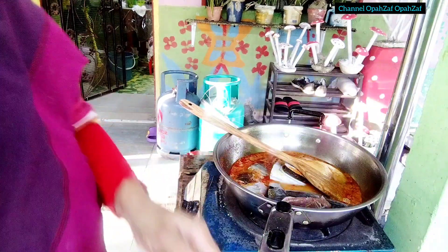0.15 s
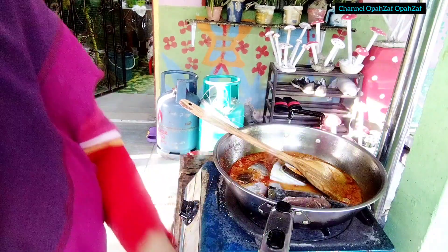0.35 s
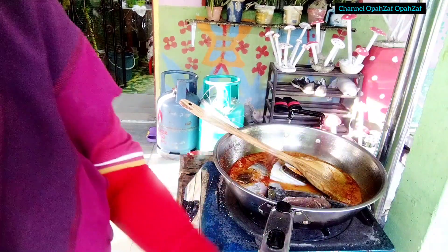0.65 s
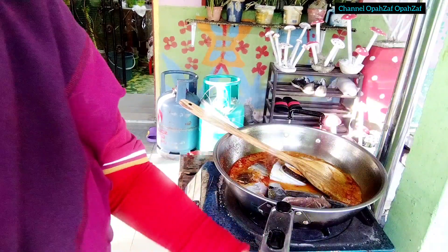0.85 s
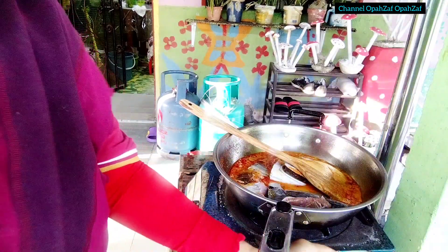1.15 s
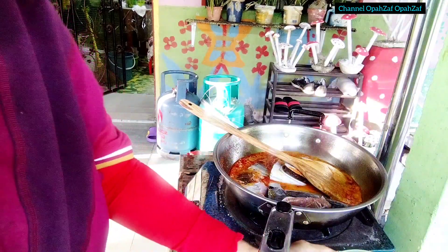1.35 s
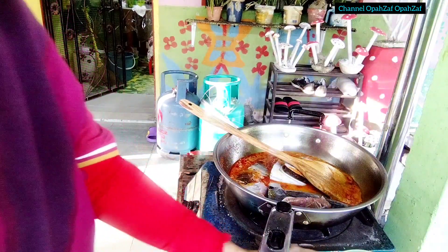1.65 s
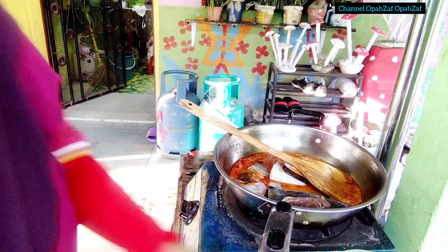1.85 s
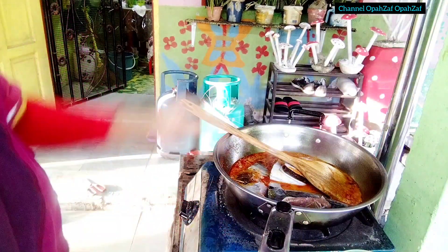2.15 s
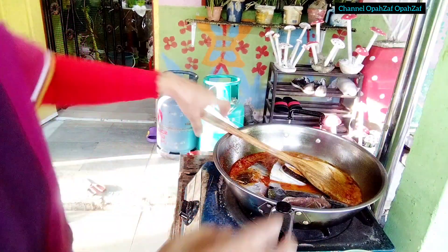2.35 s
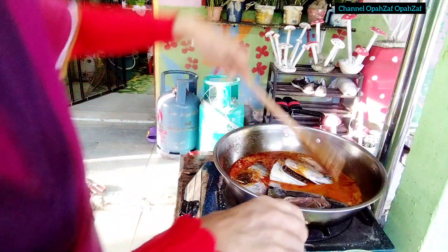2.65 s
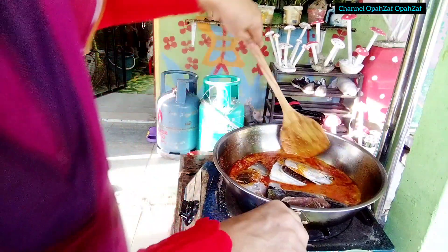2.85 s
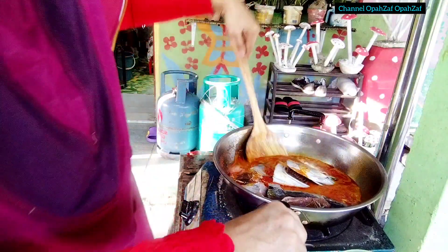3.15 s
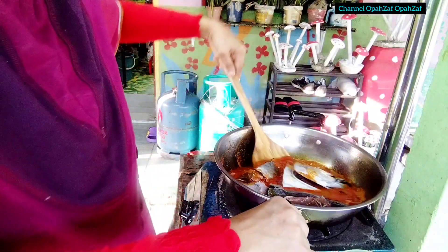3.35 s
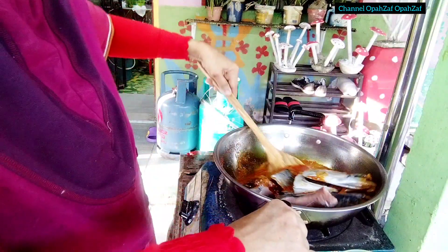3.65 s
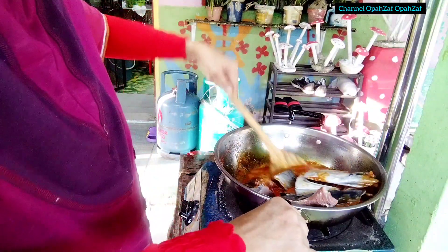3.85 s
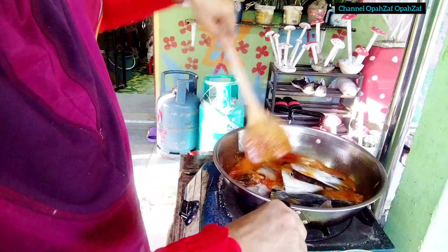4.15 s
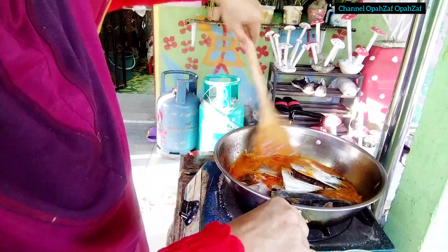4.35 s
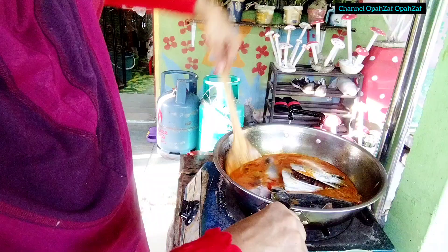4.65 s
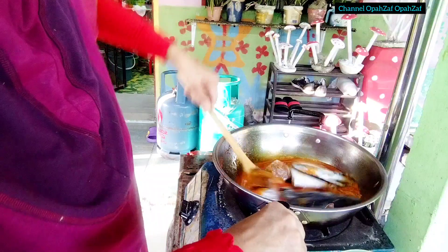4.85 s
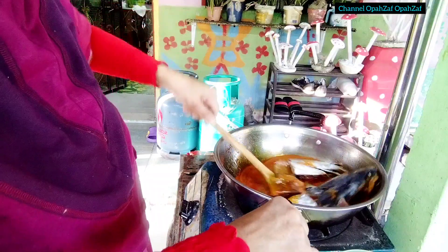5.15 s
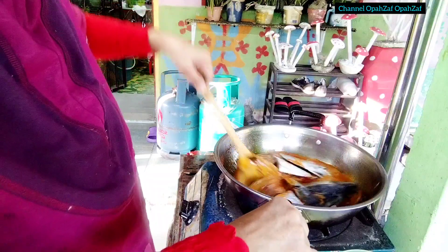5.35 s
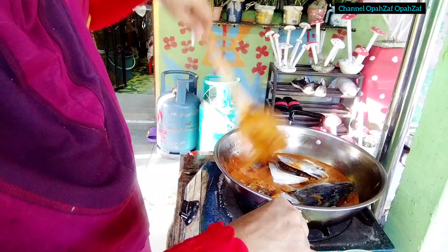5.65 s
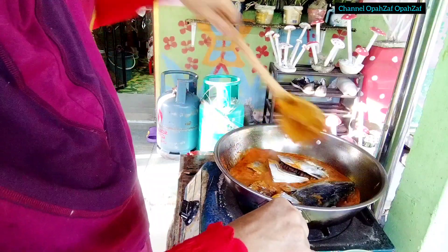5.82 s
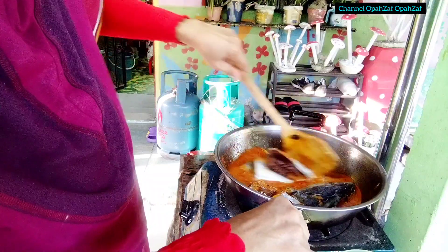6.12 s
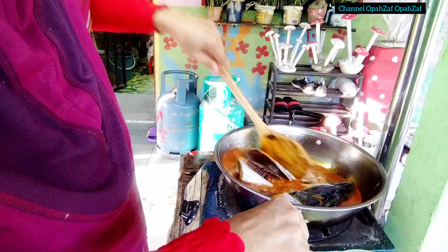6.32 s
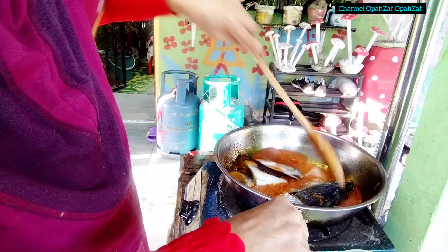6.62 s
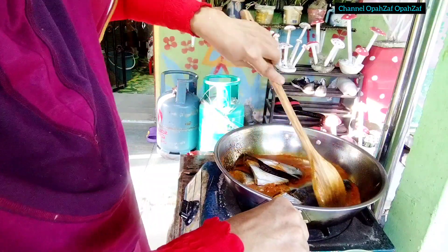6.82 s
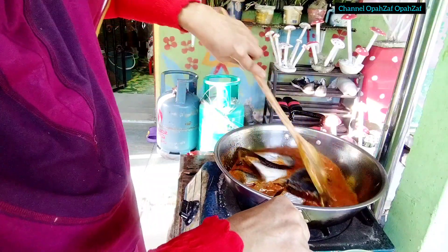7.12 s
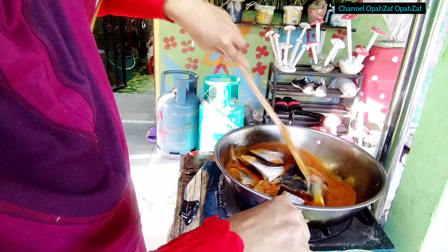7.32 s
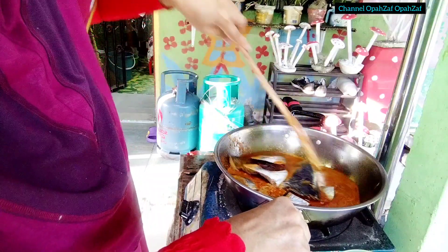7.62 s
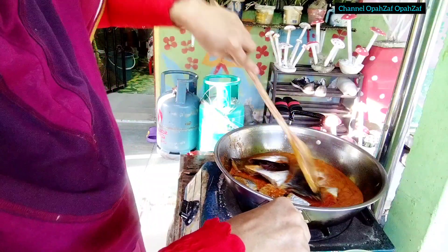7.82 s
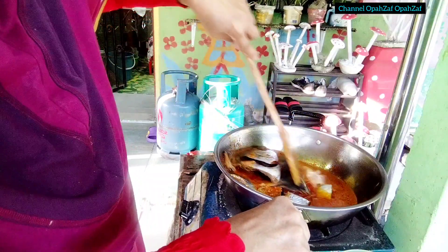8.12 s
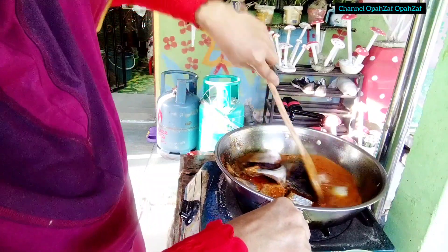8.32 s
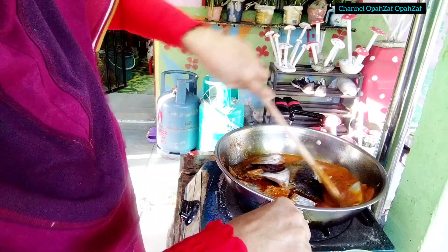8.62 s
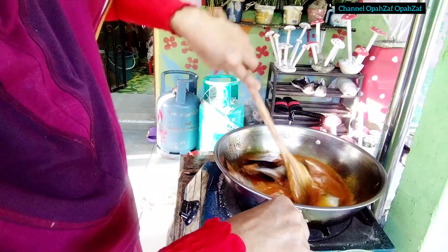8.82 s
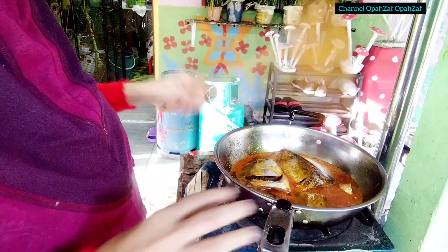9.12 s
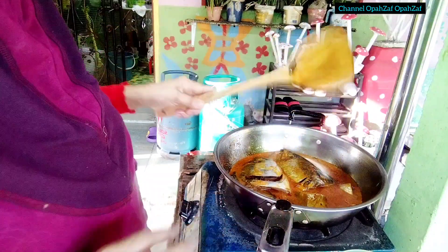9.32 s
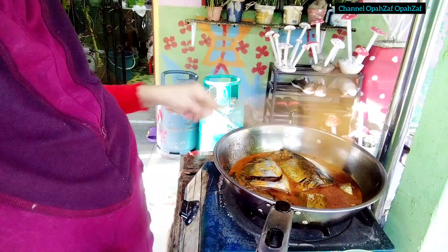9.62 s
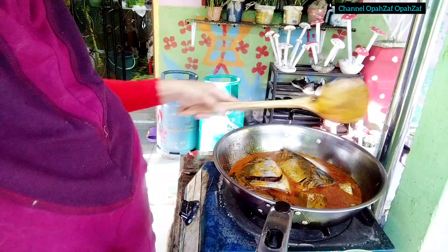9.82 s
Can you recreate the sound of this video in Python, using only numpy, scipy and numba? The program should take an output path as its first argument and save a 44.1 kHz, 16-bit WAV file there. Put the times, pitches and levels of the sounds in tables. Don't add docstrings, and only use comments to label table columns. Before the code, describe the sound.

Close to a pan of simmering curry outdoors: crisp spits and thick plops over a thin, patchy fizz, with a few early dull knocks. From about three seconds a wooden spatula stirs, scraping steel, tapping and knocking the pan, each push flaring into bright sizzle. Just before nine seconds the sound cuts abruptly to a quieter simmer with tiny ticks, small drops and soft knocks. Phone microphone, dry, with watery noise reduction.

```python
import sys
import numpy as np
from scipy import signal
from scipy.fft import rfft, irfft, next_fast_len
from scipy.io import wavfile
from scipy.ndimage import uniform_filter1d
from numba import njit

SR = 44100
rng = np.random.default_rng(int(sys.argv[2]) if len(sys.argv) > 2 else 0)


def unload_audio(sound):
    columns = np.transpose(np.atleast_2d(sound))
    steps = np.round(np.clip(columns, -1, 1) * 32767)
    wavfile.write(sys.argv[1], SR, steps.astype(np.int16))


def undo_db(level):
    steps = np.asarray(level, float) / 20
    return 10 ** steps


N = 440118
TIME = np.arange(N) / SR
CUT_S = 8.869

# frequency in Hz, density in dB per Hz.
SIMMER_SPECTRUM = [(88, -23), (150, 3.5), (405, -6), (1050, -9), (1490, -2.5), (2030, -6), (2240, -15.5),
                   (2470, -13.5), (3180, -3.5), (4980, -14.5), (7950, 1.5), (12400, -10), (15700, 2.5)]
# frequency in Hz, density in dB per Hz.
SIZZLE_SPECTRUM = [(530, -47.5), (900, -25.5), (1120, -6.5), (1320, -7), (1780, -4), (2010, -5.5),
                   (2210, -4.5), (2370, -5), (3360, -1), (4010, -1), (5890, -15.5), (8130, -4.5),
                   (12200, -21.5), (15000, -17), (15700, -16)]
# frequency in Hz, density in dB per Hz.
BUBBLE_SPECTRUM = [(59, -58), (100, -32.5), (174, -19.5), (228, -4.5), (323, -10.5), (412, -1.5),
                   (609, -16.5), (693, -7), (1100, -7.5), (1430, -30.5), (2420, -120)]
# frequency in Hz, density in dB per Hz.
HISS_SPECTRUM = [(12, -37), (30, -9), (90, -1), (200, -9), (1500, -11.5), (3000, -11), (4700, -16),
                 (5600, -11.5), (10000, -15.5), (12500, -21), (15700, -13.5)]
# frequency in Hz, level in dB.
LEARNT_NOISE = [(150, 1.5), (400, -1.5), (700, 3.5), (850, 1), (1000, 11), (1280, 12.5), (1420, 5.5),
                (1520, 2), (1750, 7), (2030, -0.5), (2280, 10.5), (2700, 6.5), (3100, -0.5), (4100, 3),
                (4600, 10.5), (6300, 4.5), (8000, -4), (10300, -1), (15700, -10.5)]
# frequency in Hz, level in dB.
PAN_MODES = [(140, -14), (195, -17), (240, -11), (295, -8), (390, -3.5), (425, -5), (555, -8.5), (630, -10),
             (750, -5), (970, -15.5), (1140, -0.5), (1400, -0.5), (1640, -19), (2040, -3.5)]
# frequency in Hz, width in Hz, level in dB.
RIM_MODES = [(1500, 35, -1), (2050, 150, 2), (2430, 44, 8), (2950, 290, -3), (3500, 940, 1.5),
             (4080, 390, -3), (5780, 540, 3.5), (6210, 170, -9)]
# time in seconds, calm sizzle level in dB.
EDGE_HEAT = [(0.0, -30.5), (0.7, -33), (1.5, -33.5), (2.2, -36), (2.64, -35), (2.82, -37), (3.5, -50.5),
             (3.62, -33.5), (4.1, -36.5), (4.27, -38.5), (5.0, -43), (5.75, -38.5), (6.15, -34.5),
             (6.45, -44.5), (6.7, -39), (8.0, -43), (8.87, -49)]
# start in seconds, peak in dB, hold in seconds, fade in dB per second, depth in dB.
SAUCE_FLARES = [(1.985, -41, 0.12, 26, 2), (2.841, -29.5, .02, 27, -3), (2.961, -30, 0.041, 24.5, 1),
                (3.043, -29, 0.03, 32, -1.5), (3.267, -39.5, 0.098, 91, 12), (3.446, -41, 0.27, 11.5, 8.5),
                (4.256, -27.5, 0.13, 26, 1.5), (4.713, -42, 0.025, 60, -11), (5.036, -30, 0.22, 45, -1),
                (5.58, -39, 0.024, 84, 3), (6.48, -37.5, 0.019, 93, -4.5), (6.76, -26, 0.042, 62, -1),
                (6.9, -35.5, 0.18, 21, 1.5), (7.086, -29, 0.073, 23, -3), (7.156, -24, 0.17, 39, 1),
                (7.724, -36.5, 0.021, 54.5, 1.5), (8.019, -39.5, 0.2, 30, -4), (8.361, -28, 0.017, 30.5, 3),
                (8.672, -32, 0.059, 20.5, 1)]
# start in seconds, fine fizz in dB, coarse spit in dB, mid fizz in dB.
LATE_SPATTER = [
    (8.872, -85, -46.5, -80.5),
    (8.948, -49, -50.5, -46),
    (9.052, -54, -70, -52),
    (9.19, -71, -49, -80),
    (9.365, -50, -42.5, -43.5),
    (9.479, -56.5, -50.5, -44.5),
    (9.62, -62, -51.5, -80),
    (9.81, -69, -66, -64),
    (9.9, -73, -52, -80),
    (9.955, -62, -61, -81),
]
# time in seconds, deep plops in dB, share of small light bubbles in dB.
BOIL_STRENGTH = [(0.0, -56, -2), (1.1, -59, -6), (1.6, -60.5, -9), (2.05, -67.5, 4), (2.25, -59.5, -6.5),
                 (2.6, -64.5, -2), (2.83, -54, -9), (3.5, -58, 2), (4.08, -53.5, -5), (4.75, -64, -0.5),
                 (5.0, -54, -5), (5.3, -58.5, 4), (5.6, -62.5, 4.5), (5.9, -68.5, -2), (6.6, -73, -0.5),
                 (7.22, -77, 8), (7.5, -65, 11.5), (7.95, -74, -23.5)]
# start in seconds, peak in dB,
# frequency in Hz.
LOUD_SPITS = [(0.0328, -22.5, 7340), (0.0857, -11, 14700), (0.194, -20, 7980), (0.312, -17, 7950),
              (0.3471, -21, 8800), (0.3998, -11, 9900), (0.4189, -19, 9860), (0.432, -12.5, 7650),
              (0.4509, -19, 8230), (0.4744, -12, 8130), (0.59, -18, 7400), (0.6464, -10, 7300),
              (0.6634, -12, 7900), (0.716, -17, 8500), (0.7507, -22, 8430), (0.841, -13, 8600),
              (0.8959, -15, 7860), (0.9228, -14, 8600), (0.9552, -13, 7560), (1.0006, -29, 7800),
              (1.055, -11, 10000), (1.0745, -11, 7870), (1.2361, -20, 7440), (1.3154, -12.5, 7900),
              (1.4416, -27, 8200), (1.4962, -16, 7900), (1.5793, -20, 8130), (1.6818, -25, 8430),
              (1.727, -15, 8000), (1.8116, -11.5, 7700), (1.8787, -13, 7810), (1.8992, -13, 8480),
              (1.9964, -6, 7640), (2.0428, -12, 7830), (2.0645, -14, 10200), (2.1056, -7.5, 8200),
              (2.14, -22, 8000), (2.171, -14.5, 7900), (2.2266, -13.5, 8090), (2.2473, -8, 8060),
              (2.2738, -10, 7040), (2.2927, -23, 8200), (2.3416, -16, 7700), (2.379, -14, 7700),
              (2.4239, -13, 7930), (2.441, -23, 7900), (2.4557, -13, 8250), (2.486, -24, 8840),
              (2.575, -26, 8150), (2.598, -15, 7970), (2.7462, -17, 8500), (2.798, -19, 8280),
              (2.818, -14, 8450), (2.869, -10, 8450), (2.8833, -25, 8070), (2.9018, -16, 8070),
              (2.9272, -21, 8070),
              (3.0895, -17, 14600), (3.1818, -14.5, 8000), (3.7939, -12, 14900), (3.8338, -21, 14900),
                 (4.3332, -29, 8400), (4.4075, -20, 7650), (4.5687, -16, 8400), (4.5976, -9, 14900),
                 (4.624, -3, 14700), (4.6789, -4, 14600), (4.7562, -8, 7200), (4.8096, -7, 14300),
                 (4.8695, -41, 7640), (4.8695, -13, 8030), (4.9812, -9, 14900), (5.1209, -18, 7700),
                 (5.3823, -19, 8010), (5.4247, -25, 8210), (5.51, -15, 8660), (5.5888, -17, 7870),
                 (5.6048, -9.5, 7800), (5.9106, -19, 8800), (6.166, -16, 8630), (6.2488, -13.5, 8650),
                 (6.7876, -21, 7800), (6.8131, -16, 7830), (6.9208, -16, 8060), (7.059, -8.5, 7900),
                 (7.0929, -16, 8300), (7.1074, -14, 8340), (7.1398, -19, 8420), (7.1702, -6.5, 7620),
                 (7.2291, -15, 7630), (7.2555, -2.5, 7700), (7.3239, -6.5, 8200), (7.3658, -4, 8400),
                 (7.5489, -33, 7800), (7.5873, -7.5, 8300), (7.7649, -27, 15200), (7.7649, -18, 8300),
                 (7.8038, -22, 8400), (7.8337, -10.5, 7760), (7.8836, -4, 14800), (7.916, -8, 14500),
                 (8.2608, -16.5, 14900), (8.3506, -6, 14900), (8.392, -13, 14900), (8.4872, -11, 8200),
                 (8.5391, -13, 8100), (8.5656, -15, 8300), (8.5855, -15, 7800), (8.6409, -11, 8200),
                 (8.7028, -14.5, 8300), (8.7152, -9, 8300), (8.7871, -19, 14900)]
# start in seconds, peak in dB, frequency in Hz.
LATE_TICKS = [(8.922, -31.5, 14300), (8.9471, -16, 8000), (8.9738, -30, 14250), (8.9795, -30.5, 8030),
              (9.0021, -32, 8170), (9.04, -29, 14100), (9.054, -21.5, 9100), (9.0897, -18.5, 14500),
              (9.1313, -24.5, 14140), (9.176, -30.5, 13200), (9.196, -31, 13960), (9.2161, -25.5, 14900),
              (9.369, -18, 14900), (9.415, -31, 14800), (9.4361, -42, 14900), (9.458, -27.5, 14300),
              (9.48, -21.5, 8140), (9.496, -25, 13100), (9.5438, -42, 14700), (9.557, -23.5, 14300),
              (9.613, -29, 13000), (9.673, -28, 14600), (9.7165, -32, 7700), (9.8142, -22, 8360),
              (9.9677, -26, 14900)]
# start in seconds, peak in dB, main ring in Hz, contact in milliseconds, ring t60 in seconds.
SPATULA_KNOCKS = [(0.825, -34, 385, 0.73, 0.087), (1.13, -24, 337, 0.81, 0.12),
                  (1.281, -16.5, 620, 0.56, 0.095), (2.645, -35, 405, 0.87, 0.096),
                  (2.852, -35.5, 277, 0.73, 0.21), (2.98, -21.5, 1220, 0.19, 0.095),
                  (4.41, -27.5, 421, 0.46, 0.29), (4.42, -21.5, 1208, 0.24, 0.13),
                  (4.659, -33.5, 315, 0.75, 0.35), (4.91, -32, 528, 0.8, 0.27),
                  (6.076, -25.5, 251, 1.1, 0.28), (6.845, -38, 420, 1.1, 0.5),
                  (7.302, -64, 1200, 0.38, 0.08), (7.674, -37.5, 389, 1.9, 0.13),
                  (8.376, -23, 696, 0.34, 0.13), (8.396, -16.5, 771, 0.3, 0.14),
                  (9.625, -33, 387, 0.58, 0.074), (9.857, -36.5, 380, 0.47, 0.17),
                  (9.641, -37.5, 678, 0.39, 0.16), (9.651, -37.5, 300, 1.3, 0.5),
                  (9.885, -40, 476, 1.1, 0.28), (9.895, -41.5, 298, 0.99, 0.2),
                  (8.398, -22, 1250, 0.4, 0.12), (1.286, -32, 331, 0.51, 0.74),
                  (1.133, -26, 655, 0.77, 0.16), (8.385, -23, 128, 1.5, 0.15), (4.051, -42, 297, 0.9, 0.31)]
# start in seconds, peak in dB, frequency in Hz, length in seconds.
BLADE_RASPS = [
    (2.003, -21, 2690, 0.0027),
    (2.874, -41, 3770, 0.014),
    (3.353, -19, 3600, 0.011),
    (3.417, -17, 3040, 0.0023),
    (5.731, -24.5, 1900, 0.0038),
    (8.339, -38, 1970, 0.021),
    (8.344, -28, 1580, 0.0051),
]
# start in seconds, peak in dB.
BLADE_TAPS = [(2.98, -18), (4.419, -13), (5.52, -27), (5.529, -31), (5.6108, -16.5), (5.621, -26),
              (5.6312, -25), (5.647, -27), (5.6566, -29), (5.7344, -32), (7.531, -17), (7.786, -22),
              (7.805, -23), (7.835, -20.5), (8.069, -37), (8.18, -25)]
# time in seconds, ring in Hz, level in dB.
SCRAPE_STROKES = [
    [(3.06, 1540, -25), (3.12, 1560, -23.5), (3.2, 1630, -23), (3.3, 1380, -24.5), (3.42, 1330, -37)],
    [(4.3, 1500, -23), (4.45, 1500, -35), (4.7, 1490, -35)],
    [(5.1, 1930, -31), (5.2, 2560, -27.5), (5.3, 2390, -28), (5.42, 2150, -32)],
    [(7.2, 1260, -50), (7.3, 1190, -28.5), (7.45, 1280, -38), (7.6, 1230, -30.5)],
    [(5.1, 1500, -32), (5.2, 1620, -31), (5.3, 1600, -36), (5.48, 1500, -37)],
    [(5.2, 4240, -34), (5.27, 4100, -32), (5.36, 3900, -40)],
    [(6.78, 2330, -26), (6.84, 2640, -24), (6.95, 2280, -29)],
]
# start in seconds, peak in dB, frequency in Hz.
LATE_DROPS = [(8.892, -37, 2420), (8.8992, -42.5, 2650), (9.053, -56.5, 3000), (9.1166, -42, 4290),
              (9.15, -42.5, 5680), (9.194, -40.5, 3100), (9.269, -43, 5750), (9.3788, -43, 3500),
              (9.406, -56, 3340), (9.491, -45, 3400), (9.5574, -38.5, 3250), (9.6357, -41, 4100),
              (9.69, -41.5, 5570), (9.695, -39.5, 4800), (9.7285, -44, 4550), (9.7594, -45, 2180),
              (9.843, -39.5, 3340), (9.8979, -39.5, 3500), (9.18, -54, 5570), (9.272, -47.5, 7570),
              (9.31, -56, 5730), (9.37, -46, 5700), (9.553, -41.5, 6070), (9.642, -41.5, 2250),
              (9.71, -42, 4300), (9.732, -42, 1210), (9.76, -49, 4740), (9.784, -59, 6800),
              (9.872, -42.5, 5670), (9.95, -52, 5650), (9.319, -56, 422), (9.43, -58.5, 461),
              (9.365, -42.5, 2030), (9.39, -47.5, 2235), (9.43, -52, 2030), (9.48, -45, 1970),
              (9.15, -45, 2150), (9.529, -51, 2450), (9.8, -52, 826), (8.93, -44, 2050)]

SIMMER_DB, LATE_SIMMER_DB, HISS_DB = -40, -6, -73.5
FLARE_RISE_S, RISE_PER_HOLD = 0.021, 0.41
SPLASH_S, SPLASH_DB = 0.013, 3
TOP_DB, TOP_SLOPE = -4, 0.96
SPIT_DB, SPIT_SLOPE, SLOSH_DB, SLOSH_SLOPE = -6, 0.96, -6, 0.9
LATE_FIZZ_FADE_DB_S, LATE_SPIT_FADE_DB_S, LATE_MID_FADE_DB_S = 102, 44.5, 170
STIRRED_DB = -29.5
JOLT_DB, JOLT_FADE_DB_S, JOLT_PER_BOIL = -30, 63, 0.24
SPIT_GAIN_DB, LATE_TICK_GAIN_DB = -1, 4.5
STRIP, LATE_STRIP, STRIP_FLOOR_DB = 1.396, 1.7, -28
RELEASE_S, RIPPLE_DB, LATE_RIPPLE_DB = .045, 3.8, 3.5
LEARN_DB, LEARN_S = -3.5, 3.2


def level(x, db):
    return x * undo_db(db) / np.sqrt(np.mean(x ** 2))


def shape_db(points, hz):
    p = np.array(points, float)
    return np.interp(np.log(hz + 1), np.log(p[:, 0]), p[:, 1], left=-90, right=-90)


def colour(x, points):
    size = next_fast_len(N)
    spec = rfft(x, size)
    even = spec / np.sqrt(uniform_filter1d(np.abs(spec) ** 2, size=4000) + 1e-18)
    hz = np.arange(len(spec)) * SR / size
    return irfft(even * undo_db(shape_db(points, hz)), size)[:N]


def highpass(x, order, hz):
    return signal.sosfilt(signal.butter(order, hz, "high", fs=SR, output="sos"), x)


def band(x, lo_hz, hi_hz):
    return level(signal.sosfilt(signal.butter(3, [lo_hz, hi_hz], "band", fs=SR, output="sos"), x), 0)


def curve(rows, column):
    rows = np.array(rows, float)
    return np.interp(TIME, rows[:, 0], rows[:, column])


def burst_db(start, peak_db, rise_s, hold_s, fade_db_s):
    x = TIME - start
    rise = np.clip(x / rise_s, 1e-5, 1)
    return peak_db + 20 * np.log10(rise) - fade_db_s * np.maximum(x - rise_s - hold_s, 0)


def total_db(levels):
    return 10 * np.log10(sum(undo_db(2 * db) for db in levels) + 1e-30)


def walk(rate):
    k = int(SR / rate)
    held = np.repeat(rng.standard_normal(N // k + 1), k)
    return 0.81 * uniform_filter1d(held, k)[:N]


def blows(s, db):
    out = np.zeros(N)
    out[(s * SR).astype(int)] = undo_db(db)
    return out


@njit
def rings(out_len, start, hz, decay_s, glide, size):
    out = np.zeros(out_len)
    for k in range(len(start)):
        w, d = 2 * np.pi * hz[k] / SR, np.exp(-1 / (decay_s[k] * SR))
        a, ph, i = size[k], 0., int(start[k] * SR)
        while abs(a) > abs(size[k]) * .003 and i < out_len and w < 2.8:
            ph += w
            out[i] += a * np.sin(ph)
            a, w, i = a * d, w * glide, i + 1
    return out


def grains(count, lo_hz, hi_hz, cycles, spread_db, glide):
    when, pitch, strength, damping = rng.random((count, 4)).T
    hz = lo_hz * (hi_hz / lo_hz) ** pitch
    size = undo_db(spread_db * np.minimum(-np.log(1 - strength), 4.6))
    return rings(N, when * N / SR, hz, cycles * (0.2 + damping) / hz, glide, size * np.sqrt(hz / lo_hz))


def pan_rim(x, share):
    out = x.copy()
    for hz, width, db in RIM_MODES:
        out += share * undo_db(0.63 * db) * signal.lfilter(*signal.iirpeak(hz, hz / max(width, 30), fs=SR), x)
    return out


def simmer():
    fizz = grains(count=60000, lo_hz=195.5, hi_hz=14900.0, cycles=3.5, spread_db=2.5, glide=0.98)
    fizz = pan_rim(level(colour(fizz, SIMMER_SPECTRUM), SIMMER_DB - 3.0), share=1.0)
    fizz = highpass(fizz, 2, 380)
    return fizz * undo_db(2.36 * walk(6.3) + LATE_SIMMER_DB * (TIME > CUT_S))


def stirring():
    flares = [burst_db(s, db, FLARE_RISE_S + RISE_PER_HOLD * hold, hold, fade)
              for s, db, hold, fade, _ in SAUCE_FLARES]
    calm = curve(EDGE_HEAT, 1)
    main = total_db([calm] + flares)
    depth = total_db([calm] + [f + row[4] for f, row in zip(flares, SAUCE_FLARES)]) - main
    splash = np.zeros(N)
    for f, row in zip(flares, SAUCE_FLARES):
        since = np.maximum(TIME - row[0] - FLARE_RISE_S, 0)
        splash += SPLASH_DB * undo_db(f - main) ** 2 * np.exp(-since / SPLASH_S)
    swing = main + 30
    top = -30.0 + TOP_DB + TOP_SLOPE * swing - splash
    spit = -30.5 + SPIT_DB + SPIT_SLOPE * swing + 0.75 * depth
    slosh = -29.0 + SLOSH_DB + SLOSH_SLOPE * swing + depth + splash
    late_top = total_db([burst_db(s, db, 0.0026, 0, LATE_FIZZ_FADE_DB_S) for s, db, _, _ in LATE_SPATTER])
    late_main = total_db([burst_db(s, db, 0.0025, 0.015, LATE_MID_FADE_DB_S) for s, _, _, db in LATE_SPATTER])
    late_spit = total_db([burst_db(s, db, 0.01, 0, LATE_SPIT_FADE_DB_S) for s, _, db, _ in LATE_SPATTER])
    late_spit = late_spit + 0.5 + 2.9 * walk(30)
    late = [late_main, late_top, late_spit, late_spit - 18]
    return np.where(TIME < CUT_S, [main, top, spit, slosh], late)


def sizzle(main_db, top_db, spit_db, slosh_db):
    roar = level(grains(count=50000, lo_hz=1020.0, hi_hz=15900.0, cycles=1.2, spread_db=0.0, glide=0.96), 0)
    roar = level(colour(roar + .5 * rng.standard_normal(N), SIZZLE_SPECTRUM), 0)
    snaps = grains(count=9000, lo_hz=2500., hi_hz=16000., cycles=1.6, spread_db=2.3, glide=1.)
    snaps = level(colour(snaps, SIZZLE_SPECTRUM), 0)
    calm = np.clip((-26.0 - main_db) / 9, .15, .6)
    pops = np.sqrt(1 - calm) * roar + np.sqrt(calm) * snaps
    pops = pan_rim(pops * undo_db(0.89 * walk(110) + 0.28 * walk(40)), share=0.38)
    out = band(pops, 5505, 11220) * undo_db(main_db)
    out += band(pops, 10690, 17000) * undo_db(top_db)
    out += band(pops, 2244, 6500) * undo_db(spit_db)
    out += band(pops, 1343, 2740) * undo_db(slosh_db - 2.5)
    deep_db = slosh_db - 7 + 0.65 * np.minimum(slosh_db + 32, 0)
    return out + band(pops, 942, 1346) * undo_db(deep_db)


def bubbling(slosh_db):
    plops = grains(count=6000, lo_hz=199.8, hi_hz=1085.0, cycles=14.0, spread_db=2.5, glide=1.00003)
    plops = colour(plops, BUBBLE_SPECTRUM)
    boil = curve(BOIL_STRENGTH, 1)
    jolts = total_db([burst_db(k[0], k[1] + JOLT_DB, 0.013, 0.025, JOLT_FADE_DB_S) for k in SPATULA_KNOCKS])
    jolts = jolts + JOLT_PER_BOIL * (boil + 60)
    stirred = STIRRED_DB + slosh_db + 0.75 * (slosh_db + 26)
    light = total_db([boil + curve(BOIL_STRENGTH, 2), jolts - 4, stirred])
    deep = total_db([boil, jolts])
    return band(plops, 140, 555) * undo_db(deep + 4.5) + band(plops, 532, 966) * undo_db(light + 6.0)


def spits():
    s, db, hz = np.transpose(LOUD_SPITS + LATE_TICKS)
    db = db + np.where(s > CUT_S, LATE_TICK_GAIN_DB, SPIT_GAIN_DB)
    s = s + np.where(s > CUT_S, .0011, .0019)
    out = rings(N, s - .0002, hz, 3.5 / hz, 1., undo_db(db - 4))
    blow = blows(s, db)
    out += undo_db(-4) * highpass(blow, 2, 6000)
    spray = signal.lfilter([1], [1, -np.exp(-1 / (0.00051 * SR))], blow)
    out += undo_db(-7.5) * spray * band(rng.standard_normal(N), 6300, 13000)
    thinnest = highpass(out, 6, 11000)
    small = hz[np.searchsorted(s, TIME + .002) - 1] > 11000
    thin = np.where(small, thinnest, highpass(out, 6, 7200))
    full = highpass(out, 2, 3500)
    full = np.where(small, 0.3 * full + 1.0 * thinnest, full)
    return np.where(TIME < CUT_S, full, thin + undo_db(-13) * blow)


def knocks():
    out, modes = np.zeros(N), np.array(PAN_MODES, float)
    wood = band(rng.standard_normal(N), 460, 2900)
    for s, db, main_hz, contact_ms, t60 in SPATULA_KNOCKS:
        detune, uneven, jitter = rng.standard_normal((len(modes) + 1, 3)).T
        hz = np.append(modes[:, 0], main_hz) * (1 + 0.028 * detune)
        soft = 1 / (1 + (hz * contact_ms / 1000) ** 4)
        mode_db = np.append(modes[:, 1] - 7 + 3.6 * uneven[:-1], -7)
        size = undo_db(db + mode_db) * soft * np.sign(jitter)
        size *= undo_db(-1.5 * np.log2(hz / main_hz) ** 2)
        decay = max(t60, .02) / np.log(1000) * (400 / hz) ** 0.35
        crack = np.exp(-np.clip(TIME - s, 0, 1) / 0.011) * (TIME > s)
        out += wood * crack * undo_db(db - 8.5 - 10 * contact_ms + 4 * np.log2(main_hz / 1100))
        for lag_s, gain in ((0, 0.83), (.011, 0.38), (.026, 0.2), (.05, 0.15)):
            start = s + lag_s + 0.00086 * np.abs(jitter)
            out += rings(N, start, hz * (1 + lag_s), decay, 1., gain * size)
    return out


def rasps():
    out = np.zeros(N)
    for s, db, hz, length in BLADE_RASPS:
        x = np.clip((TIME - s) / max(length, .0012), 0, 30)
        out += band(rng.standard_normal(N), 0.64 * hz, 1.4 * hz) * undo_db(db - 11.5) * x * np.exp(1 - x)
    return out


def taps():
    blow = blows(*np.transpose(BLADE_TAPS))
    grit = signal.lfilter([1], [1, -np.exp(-1 / (0.0013 * SR))], blow) * rng.standard_normal(N)
    blade = signal.butter(2, [1300, 4400], "band", fs=SR, output="sos")
    return signal.sosfilt(blade, 5 * blow + 0.8 * grit)


def scrape():
    out = np.zeros(N)
    for rows in SCRAPE_STROKES:
        s, hz, db = np.transpose(rows)
        place, detune, strength = rng.random((200, 3)).T
        t = s[0] + (s[-1] - s[0]) * place
        edge = np.sin(np.pi * place) ** 0.15
        size = undo_db(np.interp(t, s, db) - 6.0 + 4.0 * strength) * edge * np.sqrt(s[-1] - s[0])
        pitch = np.interp(t, s, hz) * (1 + .22 * (detune - .5))
        out += rings(N, t, pitch, np.full(len(t), .003), 1., size)
    return out


def drops():
    s, db, hz = np.transpose(LATE_DROPS)[:, :, None]
    lag, detune, loss = rng.random((len(s), 3, 6)).transpose(1, 0, 2)
    t = (s + .045 * lag ** 2).ravel()
    pitch = (hz * (1 + 0.12 * (detune - .5))).ravel()
    return rings(N, t, pitch, np.maximum(.004, 9 / pitch), 1., undo_db(db + 2 - 8 * loss).ravel())


def scene():
    levels = stirring()
    food = simmer() + sizzle(*levels) + bubbling(levels[3]) + spits() + drops()
    spatula = knocks() + rasps() + taps() + scrape()
    return (food + spatula)[None]


def strip_steady(x, strength, ripple_db):
    hz, t, spec = signal.stft(x, SR, nperseg=512, noverlap=384)
    learnt = undo_db(2 * shape_db(SIMMER_SPECTRUM, hz))
    learnt *= undo_db(2 * SIMMER_DB) / np.sum(learnt) * .75
    learnt *= strength * undo_db(2 * shape_db(LEARNT_NOISE, np.clip(hz, 160, 15600)))
    error = uniform_filter1d(rng.standard_normal(spec.shape), size=90, axis=1)
    drift_db = ripple_db * error / error.std() + LEARN_DB * np.exp(-t / LEARN_S)
    power = signal.lfilter([.16], [1, -.84], np.abs(spec) ** 2, axis=1)
    keep = 1 - learnt[:, None] * undo_db(2 * drift_db) / (power + 1e-18)
    keep = np.clip(keep * np.abs(keep), undo_db(2 * STRIP_FLOOR_DB), 1)
    fall = np.exp(-128 / SR / RELEASE_S)
    for i in range(1, keep.shape[1]):
        keep[:, i] = np.maximum(keep[:, i], fall * keep[:, i - 1])
    return signal.istft(spec * np.sqrt(keep), SR, nperseg=512, noverlap=384)[1][:N]


def band_limit(x):
    return signal.sosfilt(signal.butter(12, 16830, fs=SR, output="sos"), x)


def record(dry):
    x = highpass(dry[0], 4, 165)
    x = signal.sosfilt(signal.ellip(8, .3, 50, 15750, fs=SR, output="sos"), x)
    early = strip_steady(x * (TIME < CUT_S), STRIP, RIPPLE_DB)
    late = strip_steady(x * (TIME >= CUT_S), STRIP * LATE_STRIP, LATE_RIPPLE_DB)
    hiss = level(colour(rng.standard_normal(N), HISS_SPECTRUM), HISS_DB)
    mix = np.where(TIME < CUT_S, early, late) + hiss
    return band_limit(mix[None])


dry = scene()
out = record(dry)
unload_audio(out)
```